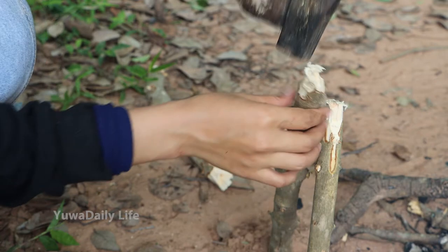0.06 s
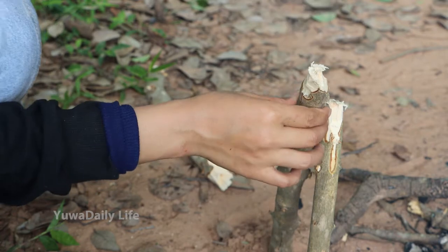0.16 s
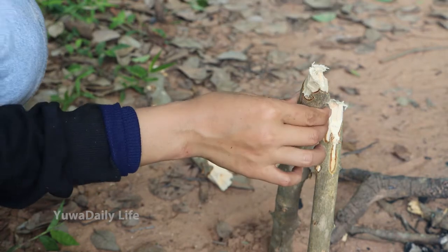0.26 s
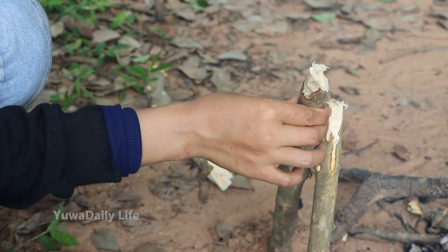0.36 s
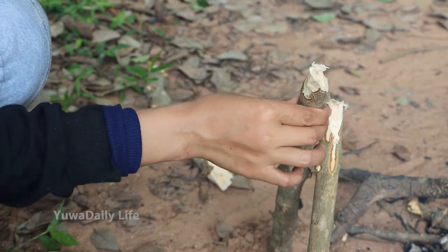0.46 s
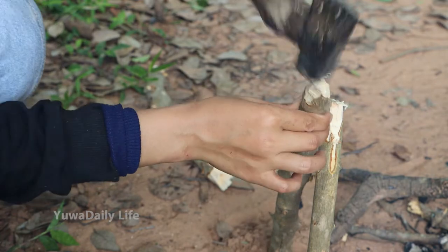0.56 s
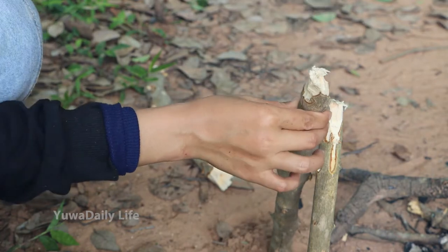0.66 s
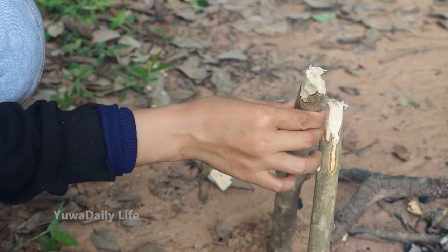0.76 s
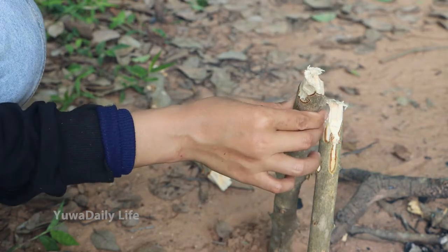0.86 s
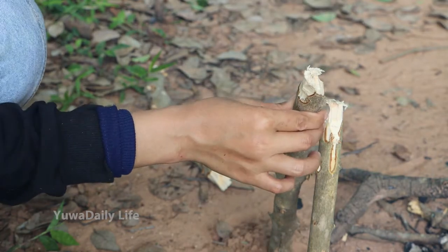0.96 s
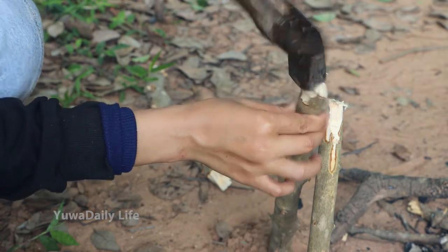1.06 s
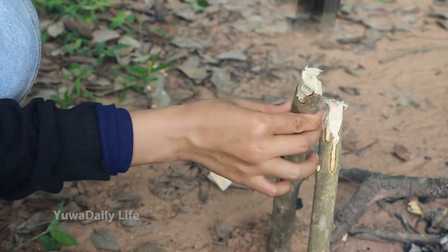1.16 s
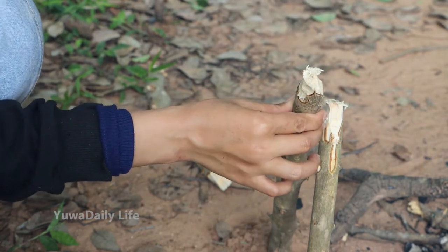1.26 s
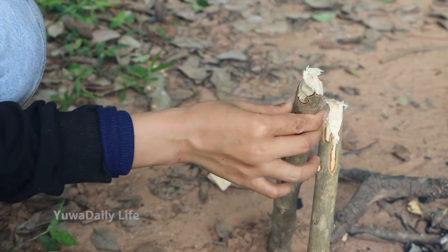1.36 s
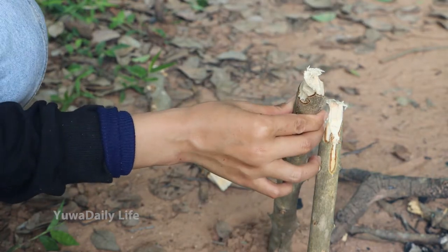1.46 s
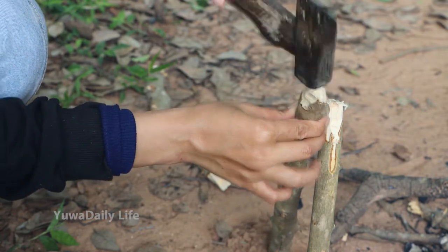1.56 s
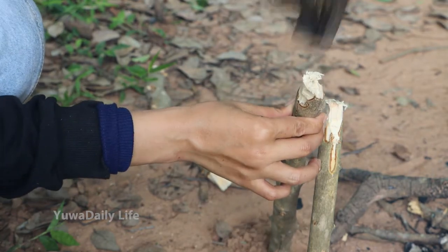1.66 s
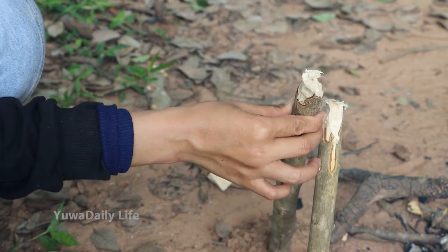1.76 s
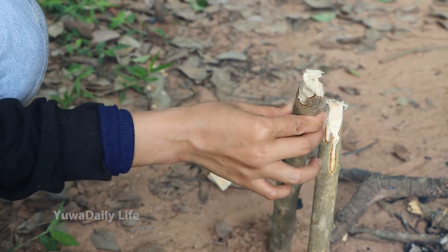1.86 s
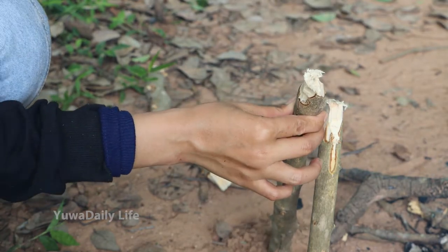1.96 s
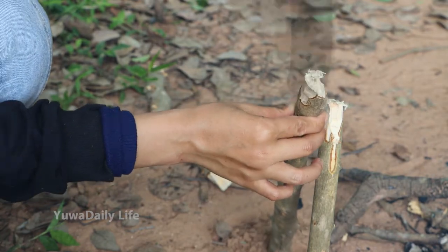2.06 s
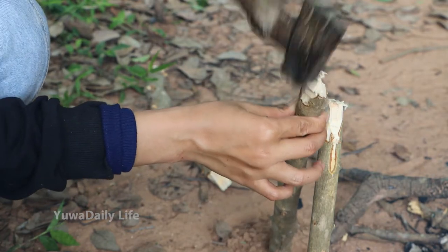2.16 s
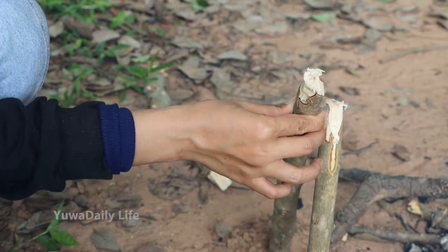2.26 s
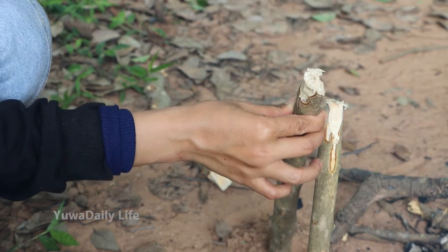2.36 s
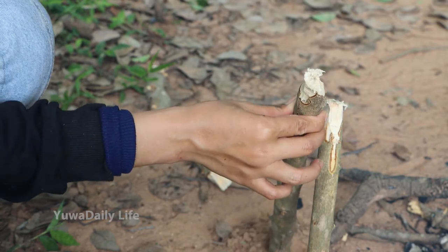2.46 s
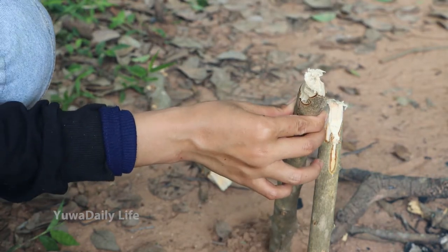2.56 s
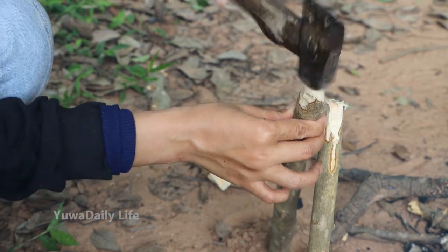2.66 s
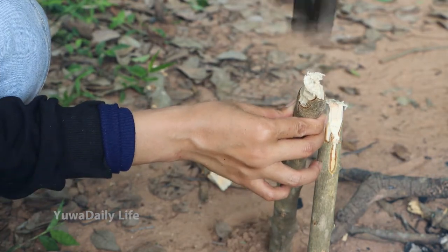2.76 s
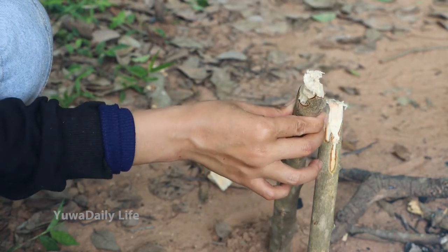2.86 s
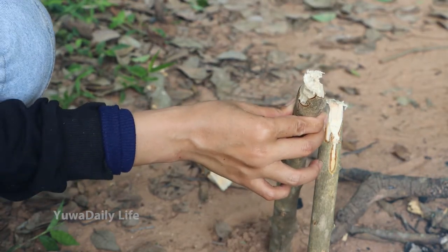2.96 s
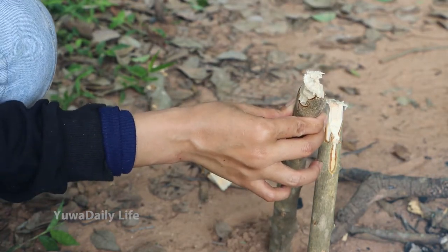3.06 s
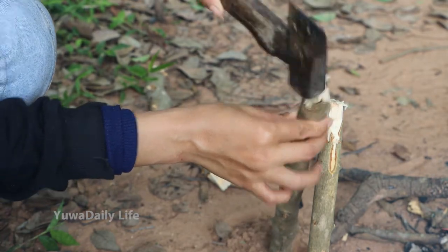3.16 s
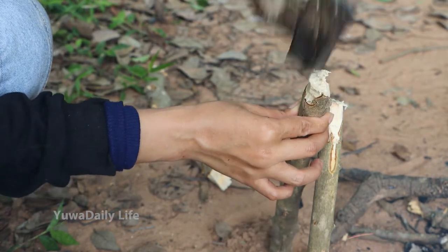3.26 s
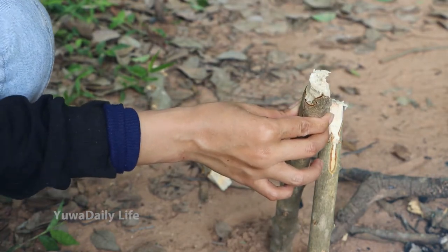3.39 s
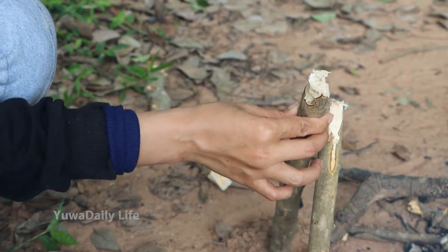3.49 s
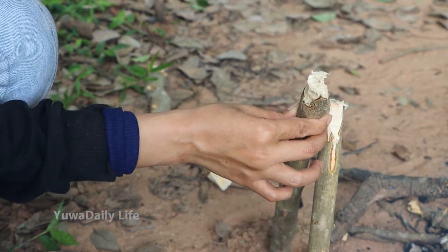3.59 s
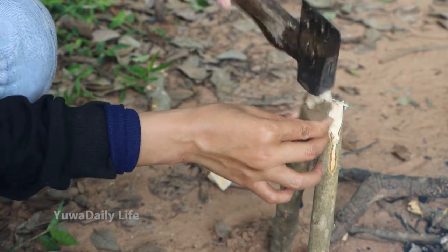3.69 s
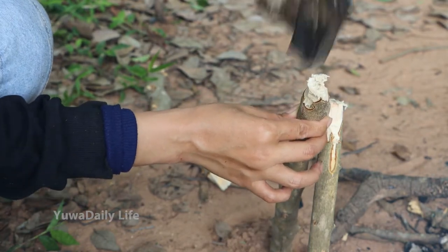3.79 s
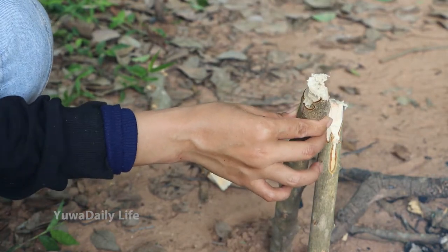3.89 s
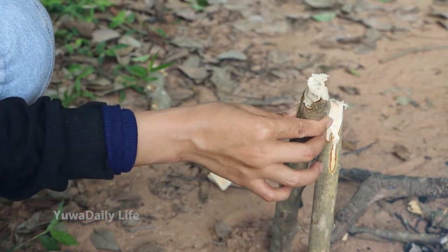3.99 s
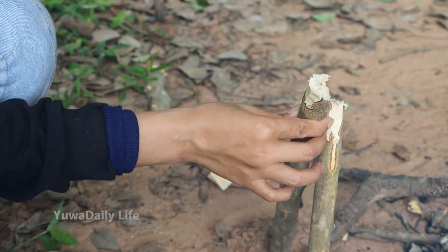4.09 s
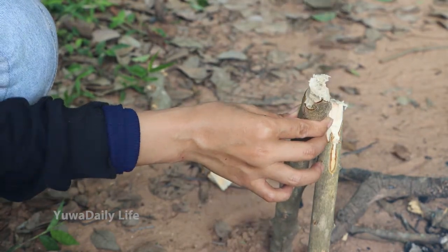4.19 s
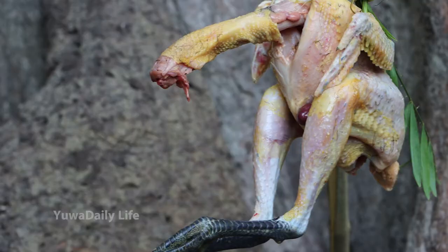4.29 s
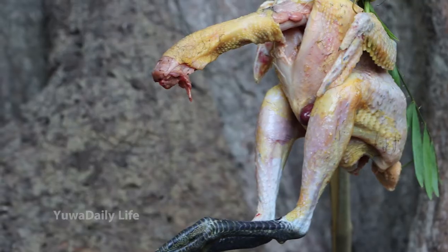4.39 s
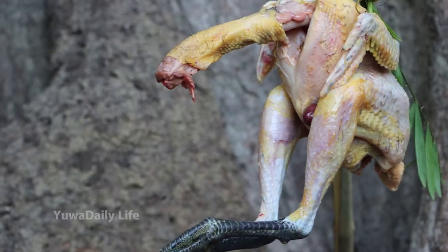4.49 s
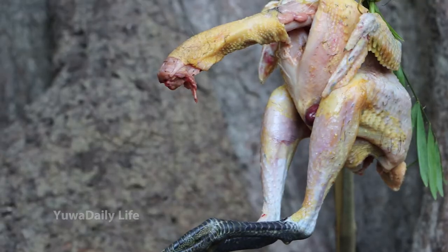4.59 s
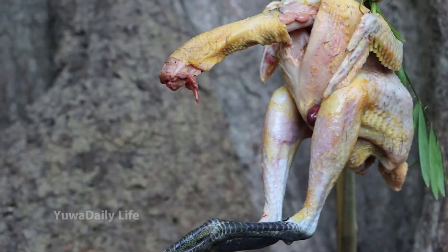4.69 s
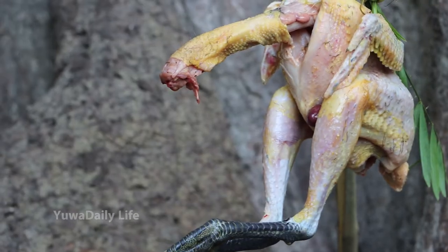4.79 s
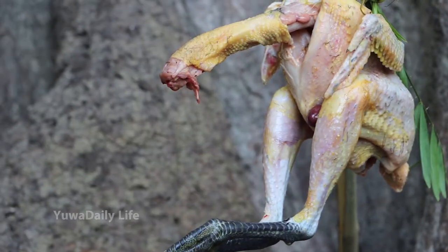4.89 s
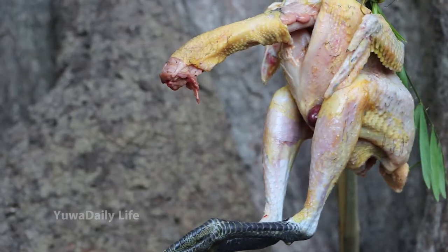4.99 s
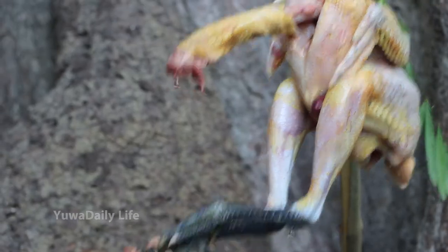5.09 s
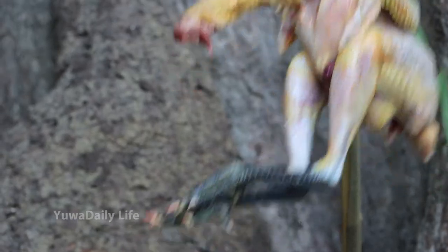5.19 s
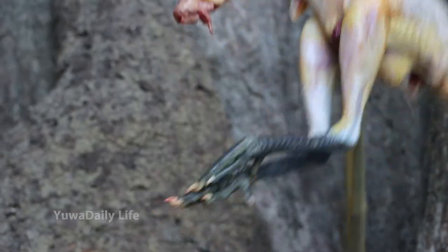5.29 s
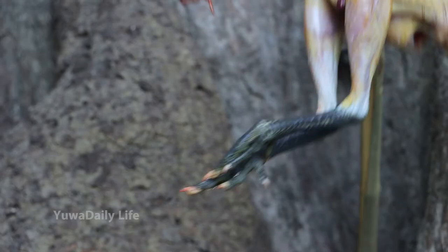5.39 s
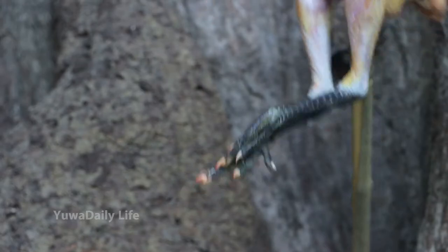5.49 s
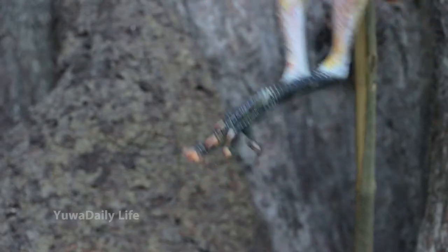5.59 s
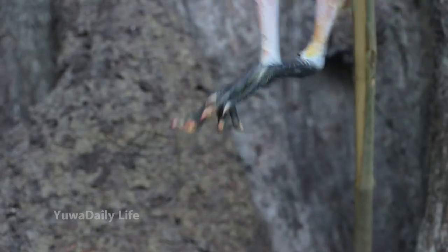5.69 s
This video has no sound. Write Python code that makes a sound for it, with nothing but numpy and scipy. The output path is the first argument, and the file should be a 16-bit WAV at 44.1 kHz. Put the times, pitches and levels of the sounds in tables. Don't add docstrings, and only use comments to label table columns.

```python
import sys
import numpy as np
from scipy import signal
from scipy.fft import rfft, irfft
from scipy.io import wavfile

SR = 44100
rng = np.random.default_rng(int(sys.argv[2]) if len(sys.argv) > 2 else 0)


def magnitude_from_level(level_db):
    exponent = np.asarray(level_db, float) / 20
    return 10 ** exponent


def to_wav(s):
    ch = np.atleast_2d(s).T
    pcm = np.round(np.clip(ch, -1, 1) * 32767)
    wavfile.write(sys.argv[1], SR, pcm.astype(np.int16))


N = 253133

# (time [s], peak [dB], off-centre [dB], brightness [dB per octave], ring of the head [dB])
BLOWS = [
    (0.5509, -11, -2, 1.5, -3),
    (1.0798, -10, 3.5, -0.5, -2),
    (1.6016, -7, -4.5, 0, 1),
    (2.1381, -8, 2.5, -1.5, 0),
    (2.6836, -9.5, -4.5, -3.5, 0.5),
    (3.211, -7.5, 5, 0.5, -4.5),
    (3.7273, -7.5, -2, -1, 1),
    (4.2796, -10, -4.5, -4, 3.5),
]


def rms_one(x):
    return x / np.sqrt(np.mean(x ** 2) + 1e-20)


def at_hz(points, hz):
    points = np.array(points)
    return np.interp(np.log(hz), np.log(points[:, 0]), points[:, 1])


def coloured(x, spectrum):
    hz = np.maximum(np.fft.rfftfreq(N, 1 / SR), 1)
    return rms_one(irfft(rfft(x) * magnitude_from_level(at_hz(spectrum, hz)), N))


def pan(db):
    return magnitude_from_level(np.array([db / 2, -db / 2]))


def add(out, s, sound):
    i = round(s * SR)
    out[..., i:i + sound.shape[-1]] += sound[..., :N - i]


def drift(rate_hz):
    r = np.exp(-80 * np.pi * rate_hz / SR)
    slow = signal.lfilter([1], [1, -2 * r, r * r], rng.standard_normal(N // 40 + 2002))[2000:]
    return np.interp(np.arange(N) / 40, np.arange(len(slow)), rms_one(slow))


def noise_bands(likeness_share):
    # (frequency [Hz], left-right likeness [-1..1])
    port_likeness = [(60, 0.17), (150, 0.89), (380, 0.94), (950, 0.39), (2380, 0.031), (5980, -0.05),
                     (15000, -0.077)]
    edges = 22 * 2 ** np.arange(0, 9.7, .4)
    white = rng.standard_normal((2, 2, N))
    for k, (low, high) in enumerate(zip(edges, edges[1:])):
        band_pass = signal.butter(2, [low, high], "band", fs=SR, output="sos")
        mid, side = signal.sosfilt(band_pass, white[k % 2])
        hz = np.sqrt(low * high)
        alike = np.clip(likeness_share * at_hz(port_likeness, hz), -1, 1)
        yield hz, np.sqrt(1 + alike) * mid + np.sqrt(1 - alike) * side * [[1], [-1]]


def clearing():
    # (frequency [Hz], level [dB per Hz])
    air_first = [(25, -27), (60, -7), (90, -2.5), (140, -6.5), (230, -11.5), (500, -15), (1200, -15.5),
                 (2500, -17.5), (5000, -21.5), (8000, -25), (10500, -29.5), (13000, -29), (13500, -28.5),
                 (14600, -48.5)]
    # (frequency [Hz], level [dB per Hz])
    air_second = [(25, -14), (60, -6.5), (100, -0.5), (140, -3), (230, -8.5), (500, -8), (1200, -10),
                  (2500, -12), (5000, -15), (8000, -18), (10500, -23), (13000, -27), (13500, -21),
                  (14600, -45.5)]
    # (time [s], level [dB])
    calm = [(0, -66.5), (1.5, -67.5), (3.6, -69.5), (4.34, -68.5)]
    # (time [s], level [dB])
    rustle = [(4.352, -72), (4.42, -69.5), (4.8, -70.5), (5.2, -71), (5.74, -72.5)]
    # (frequency [Hz], level [dB per Hz])
    tree_colour = [(180, -32.5), (300, 1.5), (523, -17), (587, -12), (1820, -12.5), (2210, -9.5),
                   (4770, -15), (9960, -30.5), (13400, -21.5), (15000, -39.5)]
    # (frequency [Hz], decay by 60 dB [s])
    tree_decay = [(300, 0.27), (1500, 0.71), (4000, 0.57), (8000, 0.43), (14000, .2)]
    rise_s, trees_db = .016, -41
    wash_db, wash_follows = -6, .6
    near_db, near_t60_s = 18, 0.045

    t = np.arange(N) / SR
    calm_db = np.interp(t, *np.transpose(calm))
    rustle_db = np.interp(t, *np.transpose(rustle))
    since = t - np.array(BLOWS)[:, :1]
    after_blow = np.maximum(since, 0)
    swell = (since > 0) * (1 - np.exp(-(since / rise_s) ** 2))
    blow_db = wash_db + wash_follows * np.array(BLOWS)[:, 1:2] + trees_db
    near = np.sum((since > .002) * magnitude_from_level(blow_db + near_db - 60 * after_blow / near_t60_s), axis=0)

    air, wash, power, together = 0, 0, 0, drift(2.5)
    for hz, band in noise_bands(likeness_share=0.96):
        patches = magnitude_from_level(0.51 * together + .9 * drift(6.5))
        air = air + patches * band
        dying = swell * magnitude_from_level(blow_db - 60 * after_blow / at_hz(tree_decay, hz))
        echo = magnitude_from_level(at_hz(tree_colour, hz)) * np.roll(band, N // 3, axis=1)
        wash = wash + (near + dying.sum(axis=0)) * magnitude_from_level(2.2 * drift(40.0)) * echo
        power = power + np.mean(echo ** 2)
    before = magnitude_from_level(calm_db) * pan(-1)[:, None] * coloured(air, air_first)
    before = before + wash / np.sqrt(power) * pan(-1.6)[:, None]
    after = magnitude_from_level(rustle_db + 4.0) * pan(-0.3)[:, None] * coloured(air, air_second)
    return before, after


def birds():
    # (start [s], length [s], frequency [Hz], glide [Hz per s], level [dB])
    calls = [
        (0.968, .07, 3130, -250, -81),
        (2.883, .17, 6200, -600, -86),
        (3.46, 0.039, 3080, -3500, -76.5),
        (3.517, .08, 2830, -500, -81),
        (3.603, .033, 2590, -3000, -78),
        (3.645, 0.059, 2460, -150, -76),
        (3.792, 0.091, 1860, 450, -83),
        (3.899, .135, 1930, 15, -77.5),
        (4.051, .07, 1880, -250, -85),
        (5.27, 0.11, 9520, -100, -83),
    ]
    edge_s = .012
    out, waver, flutter_db = np.zeros(N), 1 + .006 * drift(38.4), 2.2 * drift(26.0)
    for s, length, hz, glide, level_db in calls:
        t = np.arange(int(length * SR)) / SR
        here = slice(round(s * SR), round(s * SR) + len(t))
        edges = np.clip(np.minimum(t, length - t) / edge_s, 0, 1)
        phase = 2 * np.pi * np.cumsum((hz + glide * t) * waver[here]) / SR
        add(out, s, magnitude_from_level(level_db + flutter_db[here]) * edges * np.sqrt(2) * np.sin(phase))
    return out


def small_events(table, trim_db):
    out, t = np.zeros((2, N)), np.arange(int(.3 * SR)) / SR
    noises = rng.standard_normal((len(table), len(t)))
    for (s, peak_db, hz, octaves, t60, pan_db), noise in zip(table, noises):
        edges = np.clip(hz * 2 ** (np.array([-.5, .5]) * octaves), 20, [.44 * SR, .45 * SR])
        band_pass = signal.butter(2, edges, "band", fs=SR, output="sos")
        burst = signal.sosfilt(band_pass, noise * magnitude_from_level(-60 * t / t60))
        add(out, s, magnitude_from_level(peak_db + trim_db) * burst / np.abs(burst).max() * pan(pan_db)[:, None])
    return out


def litter():
    # (time [s], peak [dB], centre [Hz], left-right [dB])
    ticks = [
        (1.2918, -53.5, 6430, -8),
        (1.3994, -60, 6500, -1.0),
        (1.735, -55, 2530, -5.5),
        (2.08, -54, 4340, 17),
        (5.3, -62, 5030, 1.5),
        (5.368, -54.5, 3320, 2),
    ]
    # (time [s], peak [dB], centre [Hz], left-right [dB])
    thuds = [
        (0.779, -56, 70, 3),
        (1.009, -61, 97, 8),
        (1.249, -52.5, 81, 19),
        (2.29, -56.5, 87, 1),
        (4.511, -52, 161, -16),
        (4.769, -57, 231, -9),
        (4.816, -58, 131, -15),
        (4.984, -52.5, 1380, 15),
    ]
    # (time [s], peak [dB], left-right [dB])
    leaves = [(0.6584, -60, -6.5), (0.7758, -52.5, -11), (0.8104, -68, -1.5), (1.6826, -53.5, -8),
              (2.387, -64, -6), (2.652, -53, -12.5), (3.2887, -54, -12.5), (3.8529, -55, -9),
              (4.0903, -53, -6), (4.5394, -65.5, -5.5), (4.6897, -60.5, -9), (4.8408, -64, -4)]
    # (time [s], peak [dB], left-right [dB])
    taps = [
        (3.6445, -60, -1.5),
        (3.8526, -51.5, -8),
        (4.3594, -39.5, -14.5),
        (4.5116, -57, -7),
        (4.8189, -54, -14),
        (4.9838, -47.5, 15),
        (5.436, -46, -1),
    ]
    # (time [s], peak [dB], left-right [dB])
    swishes = [
        (4.37, -50.5, -1),
        (4.5116, -50, -2),
        (4.9852, -33.5, 5),
        (5.436, -50, 4.5),
    ]
    # (time [s], peak [dB], left-right [dB], pitch ratio)
    stick_knocks = [
        (3.645, -61, 0.1, .92),
        (4.359, -45.5, -9.5, 1.02),
    ]
    # (frequency [Hz], level [dB], width [octaves], decay by 60 dB [s])
    hollow = [
        (390, -3.5, .3, 0.067),
        (1060, 2.5, 0.57, .028),
        (2620, 3.5, 0.33, 0.015),
    ]
    # (width [octaves], decay by 60 dB [s])
    twig, thud, leaf, tap, swish = (0.8, .014), (1.6, .045), (1.1, .012), (3.13, 0.019), (3.2, 0.36)
    leaf_hz, tap_hz, swish_hz = 11520, 3450, 6000

    sharp = [(s, db, hz, *twig, side) for s, db, hz, side in ticks]
    sharp += [(s, db, leaf_hz, *leaf, side) for s, db, side in leaves]
    sharp += [(s, db, tap_hz, *tap, side) for s, db, side in taps]
    for s, db, side, ratio in stick_knocks:
        sharp += [(s, db + mode_db, hz * ratio, width, t60, side) for hz, mode_db, width, t60 in hollow]
    soft = [(s, db, swish_hz, *swish, side) for s, db, side in swishes]
    dull = [(s, db, hz, *thud, side) for s, db, hz, side in thuds]
    return small_events(sharp, trim_db=-1.0) + small_events(soft, trim_db=-15) + small_events(dull, trim_db=-6.5)


def soil_levels():
    return -24.5 + 3.5 * np.log10(np.arange(1, len(BLOWS) + 1))


def rumbles():
    # (delay [s], level under the thump [dB], centre [Hz], width [octaves], decay by 60 dB [s], left-right [dB])
    soil_tail = (.022, -27, 169.5, 1.28, 0.29, -1.5)
    delay, under_db, *colour = soil_tail
    rows = [(s + delay, peak_db + under_db, *colour) for (s, *_), peak_db in zip(BLOWS, soil_levels())]
    return small_events(rows, trim_db=0.0)


def thumps():
    # (arrival [s], centre [s], half length [s], start [Hz], fall [per s], level [dB])
    soil_waves = [
        (0, .008, .0045, 390, 100.0, 0.1),
        (.0211, .029, .006, 190, 1.1, -21),
        (.034, .040, .004, 150, 20.0, -30),
    ]
    lead_s = .0004
    t, shape = np.arange(int(.09 * SR)) / SR, 0
    for arrival, centre, half, start_hz, fall, level_db in soil_waves:
        since = np.maximum(t - arrival, 0)
        cycles = start_hz * (1 - np.exp(-fall * since)) / fall
        packet = np.exp(-((t - centre) / half) ** 2 / 2) * np.sin(2 * np.pi * cycles)
        shape = shape - magnitude_from_level(level_db) * packet
    out = np.zeros(N)
    for (s, *_), peak_db in zip(BLOWS, soil_levels()):
        add(out, s - lead_s, magnitude_from_level(peak_db + 0.5) * shape)
    return signal.sosfilt(signal.butter(3, 62, "high", fs=SR, output="sos"), out)


def knocks():
    # (frequency [Hz], level [dB], decay by 60 dB [s])
    knock_modes = [(603.3, -0.35, 0.01), (783, -6, 0.013), (1152.5, -1.04, 0.014), (1562, -3.5, .012),
                   (1852, -2.5, 0.014), (2104, -12, .04), (2338, -6.5, 0.015), (2555, -5.5, 0.0048),
                   (3095, -6.5, .012), (3404, -6.5, 0.013), (3873, -7.5, .01), (4136, -3, 0.0098),
                   (4559, -6.5, .012), (5060, -11, 0.0088),
                   (5572, -5.5, .012), (6276, -3.5, .012), (7220, -5.5, .012), (8526, -2, .012),
                  (9310, -7.5, 0.013), (10280, -5.5, 0.011), (11390, -5, .012), (12106, -2, 0.01),
                  (14137, -2.5, .012), (14100, -3.5, .01), (15270, -2, .01), (15850, -2.5, .01)]
    # (frequency [Hz], level under the peak [dB])
    square_blow = [(1150, -14), (1750, -15), (2700, -10), (4500, -16.5), (8000, -28), (12500, -33)]
    # (frequency [Hz], share of off-centre dB)
    off_centre = [(800, 0), (1150, 1), (1750, -1), (2500, 0)]
    contact_s, slap_s, slap_db, lead_s = 0.0029, .00013, -3, .0005
    echo_s, echo_db = .0027, -4
    bright_from_hz, bright_to_hz, head_from_hz = 2000, 8000, 10000
    pushed_below_hz, pushed_db = 900, -4.5

    modes_all = knock_modes
    out, t = np.zeros(N), np.arange(int(0.051 * SR)) / SR
    luck = rng.standard_normal((len(BLOWS), 3, len(modes_all), 1))
    hz, level_db, t60 = np.transpose(modes_all)[:, :, None]
    pressing = np.sin(np.pi / 2 * np.minimum(t / 0.0011, 1)) * magnitude_from_level(-600 * t)
    squeeze = ((t - 3 * slap_s) / slap_s) ** 2
    slap = magnitude_from_level(slap_db) * (squeeze - 1) * np.exp(-squeeze / 2)
    octaves = np.log2(np.clip(hz, bright_from_hz, bright_to_hz) / bright_from_hz)
    held_s = contact_s * (hz / 1000) ** -.22
    dying_db = -60 * np.maximum(t - held_s, 0) / t60
    for blow, soil_db, (shift, size, phase) in zip(BLOWS, soil_levels(), luck):
        s, peak_db, off_db, bright_db, ring_db = blow
        colour_db = at_hz(square_blow, hz) + off_db * at_hz(off_centre, hz)
        colour_db = colour_db + np.where(hz > head_from_hz, ring_db, bright_db * octaves)
        driven_db = np.where(hz < pushed_below_hz, soil_db + pushed_db - peak_db, colour_db)
        strength_db = level_db + driven_db + 1.4 * size
        moved_hz = hz * (1 + 0.017 * shift)
        shaking = np.cumsum(rng.standard_normal((len(hz), len(t))), axis=1)
        crush = 0.035 * np.maximum(hz / 1000 - 1.2, 0) * shaking
        modes = magnitude_from_level(strength_db + dying_db) * np.sin(2 * np.pi * moved_hz * t + 3 * phase + crush)
        add(out, s - lead_s, magnitude_from_level(peak_db) * (magnitude_from_level(3) * pressing * modes.sum(axis=0) + slap))
        add(out, s - lead_s + echo_s, magnitude_from_level(peak_db + echo_db) * slap)
    return signal.sosfilt(signal.butter(2, 220, "high", fs=SR, output="sos"), out)


def ports(x):
    # (frequency [Hz], left-right [dB])
    balance = [(60, 0.0), (130, -0.5), (290, 1.5), (640, -2), (1410, -4), (3100, -3.5), (6820, -1.5),
               (15000, -8)]
    # (frequency [Hz], lead of the left port [radians])
    port_phase = [(0, 0), (150, 0.26), (500, -0.32), (1200, -1), (2500, -1.1), (4800, -0.8), (6800, -1.85),
                  (8300, -1.5), (10500, -2), (12500, -1), (16000, -3)]
    hz = np.maximum(np.fft.rfftfreq(N, 1 / SR), 1)
    lead = np.interp(hz, *np.transpose(port_phase))
    half = magnitude_from_level(at_hz(balance, hz) / 2) * np.exp(.5j * lead)
    return irfft(rfft(x) * [half, 1 / half], N)


def scene():
    change_s, gap_s, fade_s = 4.341, .010, .005
    t = np.arange(N) / SR
    before, after = clearing()
    small = litter() + birds()
    blows = ports(knocks() + thumps()) + rumbles()
    ending = np.clip((change_s - t) / 0.002, 0, 1)
    opening = np.clip((t - change_s - gap_s) / fade_s, 0, 1)
    return ending * (before + blows + small) + opening * (after + small)


def roll_off(x):
    return signal.sosfilt(signal.butter(12, 16550, fs=SR, output="sos"), x)


def record(dry):
    low_hz, dip_hz, dip_width_hz, dip_db = 25, 9950, 120, -6
    top_hz, fall_db_per_khz = 13500, -8.5
    hz = np.fft.rfftfreq(N, 1 / SR)
    notch_db = dip_db * np.exp(-((hz - dip_hz) / dip_width_hz) ** 2)
    top_db = fall_db_per_khz * np.maximum(hz - top_hz, 0) / 1000
    thin = signal.sosfilt(signal.butter(2, low_hz, "high", fs=SR, output="sos"), dry)
    mix = irfft(rfft(thin) * magnitude_from_level(notch_db + top_db), N)
    return roll_off(mix)


dry = scene()
out = record(dry)
to_wav(out)
```